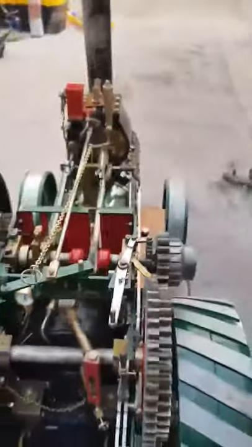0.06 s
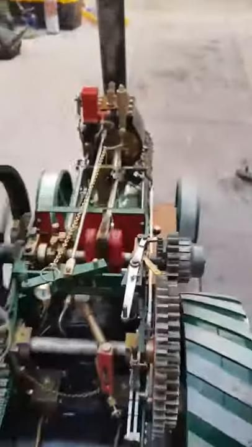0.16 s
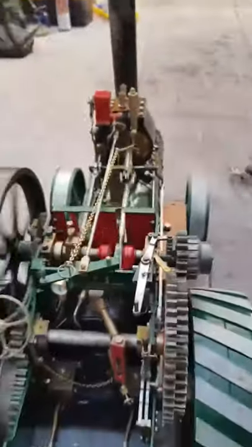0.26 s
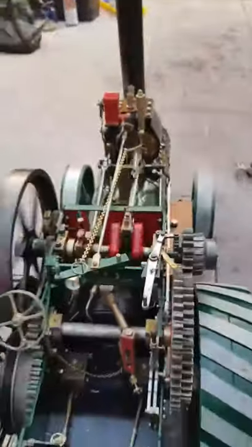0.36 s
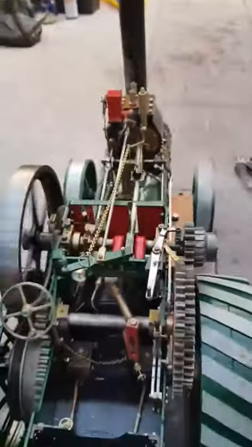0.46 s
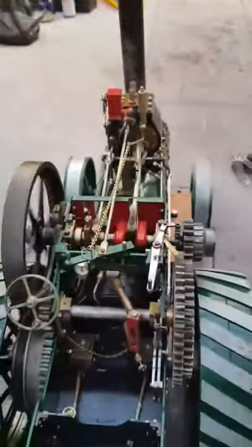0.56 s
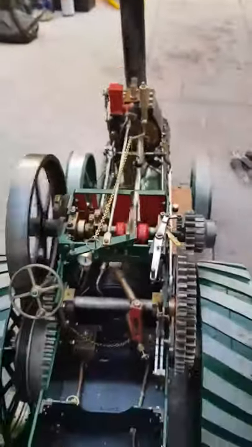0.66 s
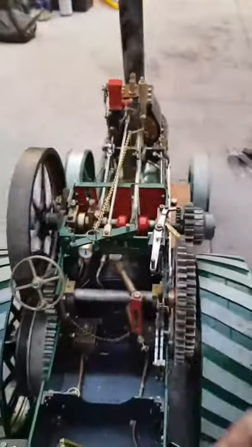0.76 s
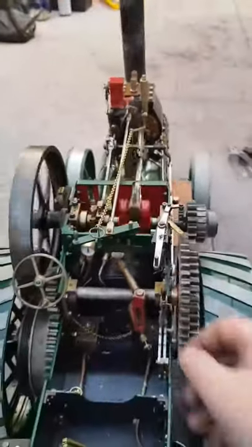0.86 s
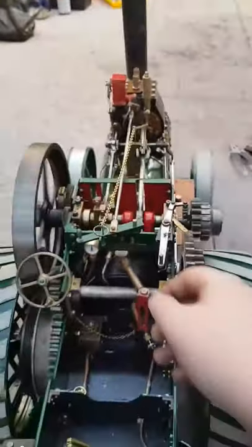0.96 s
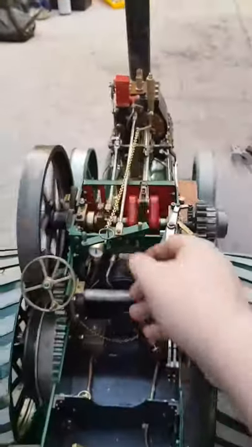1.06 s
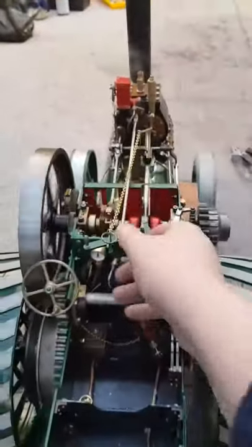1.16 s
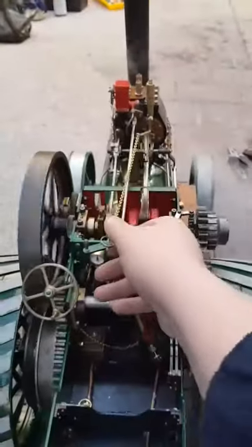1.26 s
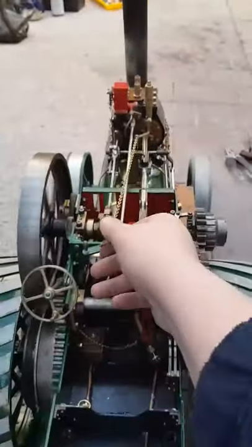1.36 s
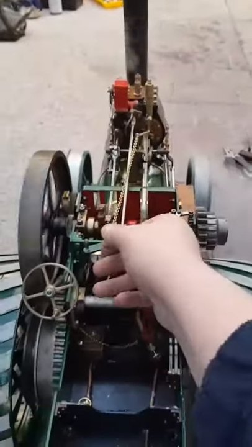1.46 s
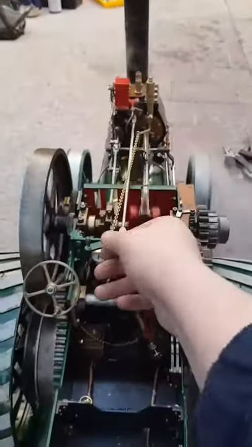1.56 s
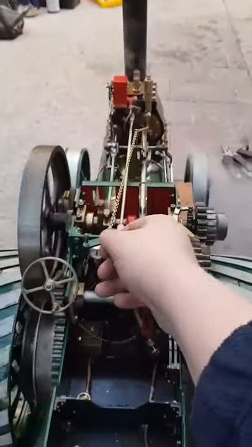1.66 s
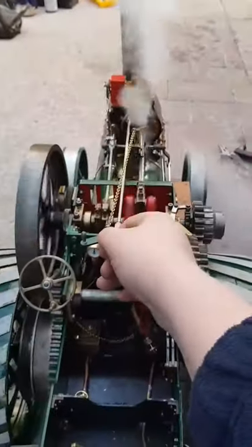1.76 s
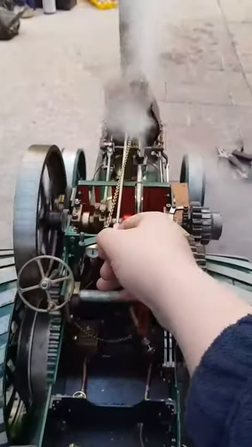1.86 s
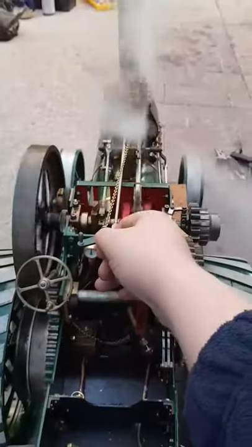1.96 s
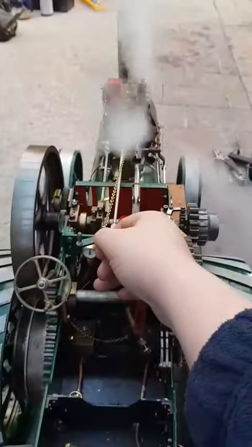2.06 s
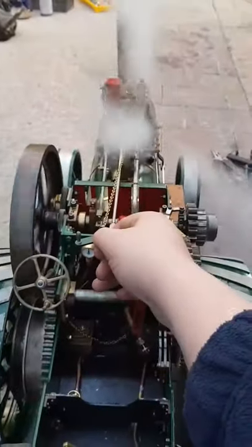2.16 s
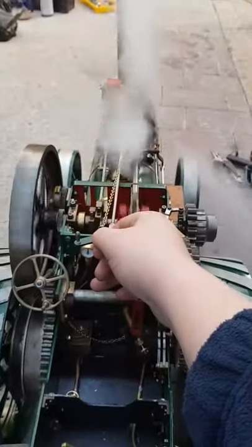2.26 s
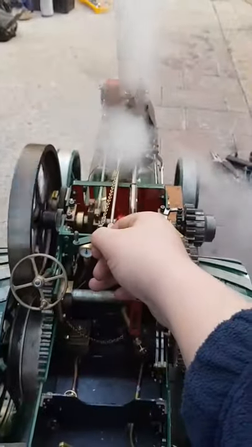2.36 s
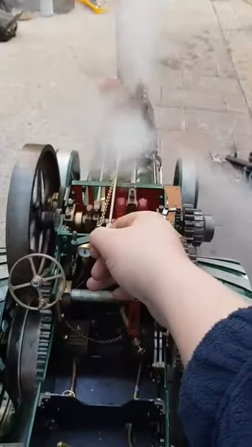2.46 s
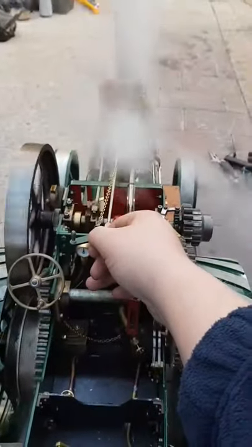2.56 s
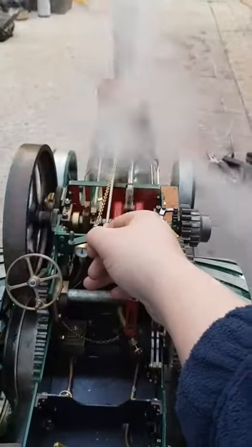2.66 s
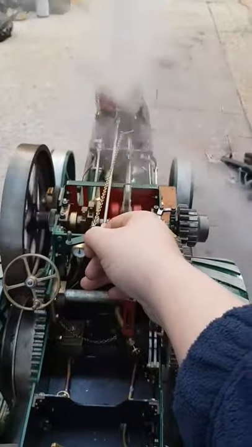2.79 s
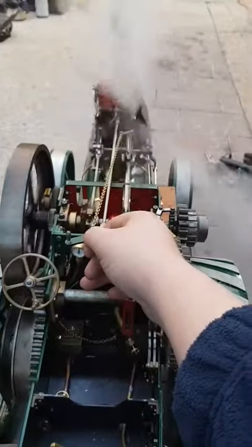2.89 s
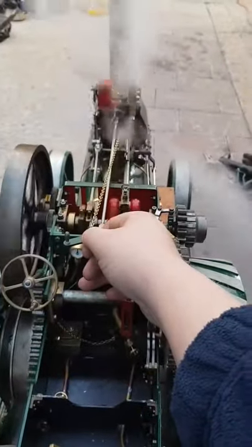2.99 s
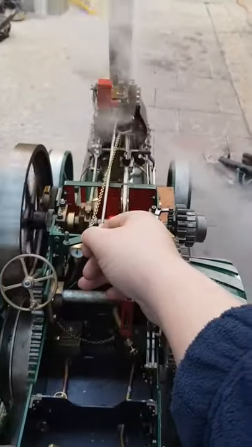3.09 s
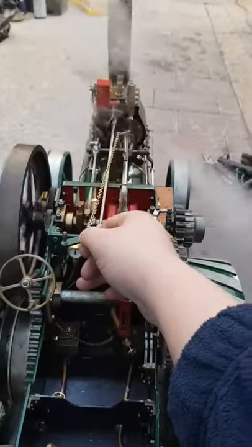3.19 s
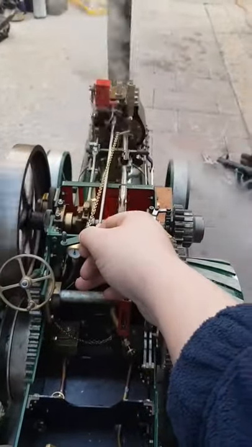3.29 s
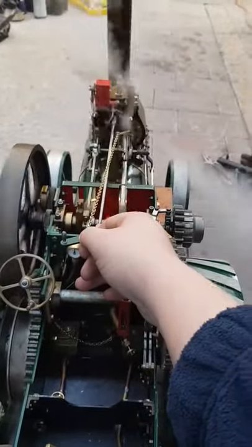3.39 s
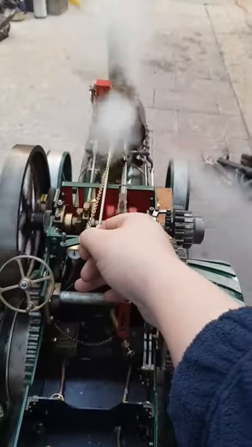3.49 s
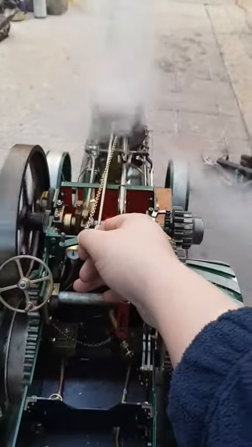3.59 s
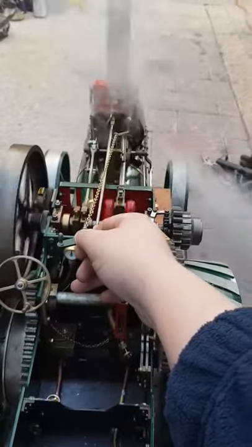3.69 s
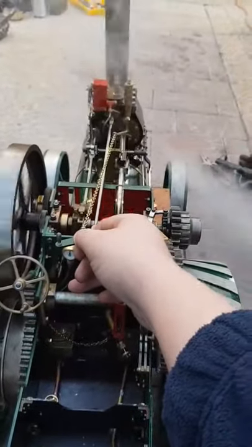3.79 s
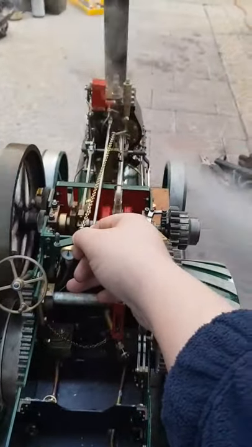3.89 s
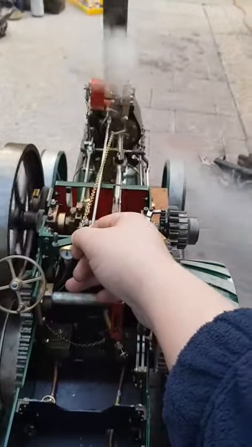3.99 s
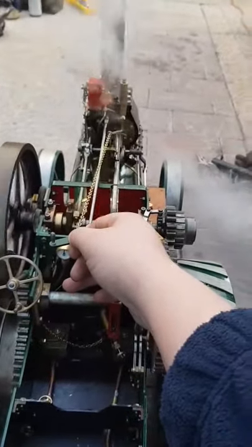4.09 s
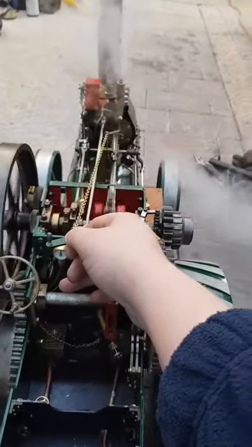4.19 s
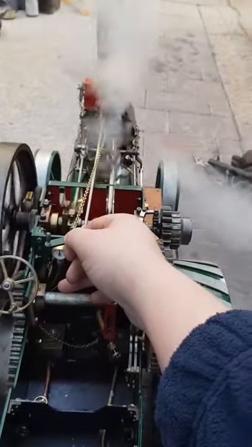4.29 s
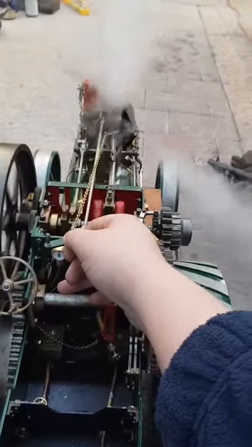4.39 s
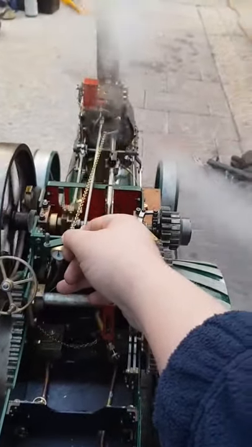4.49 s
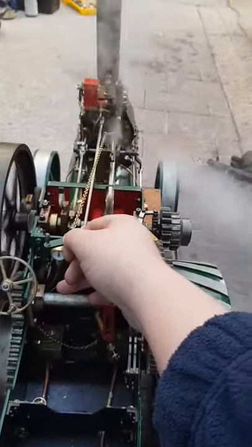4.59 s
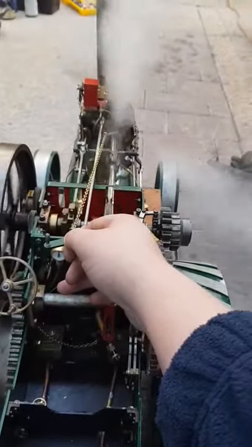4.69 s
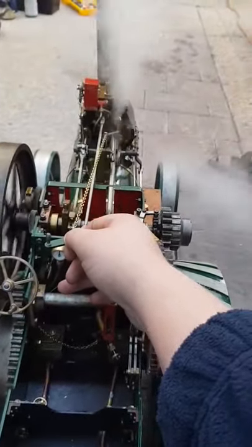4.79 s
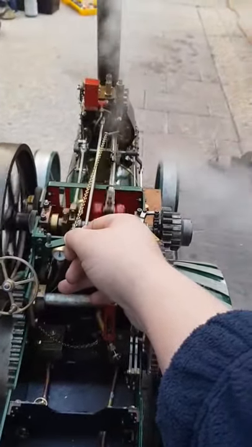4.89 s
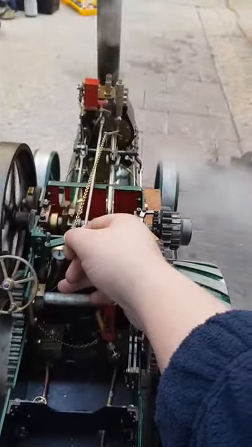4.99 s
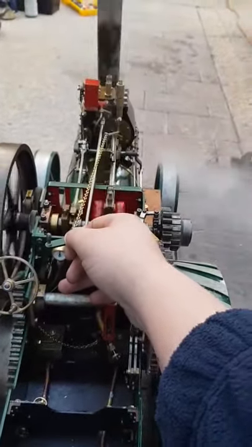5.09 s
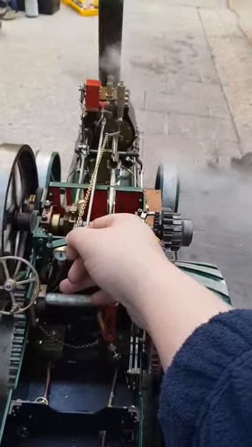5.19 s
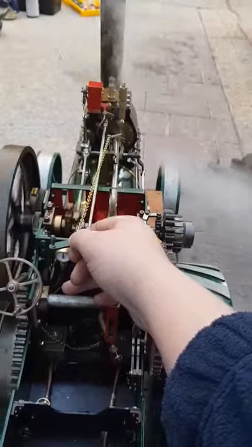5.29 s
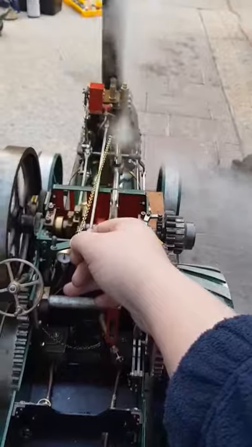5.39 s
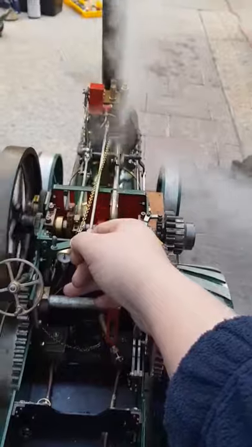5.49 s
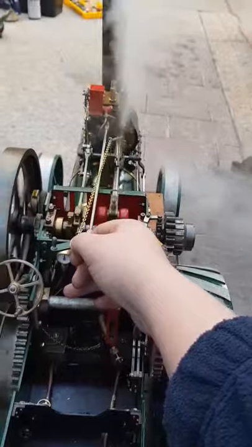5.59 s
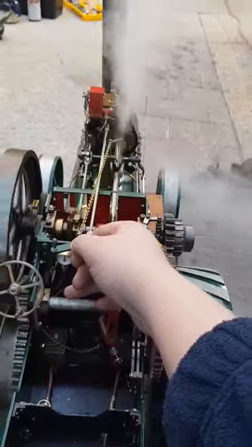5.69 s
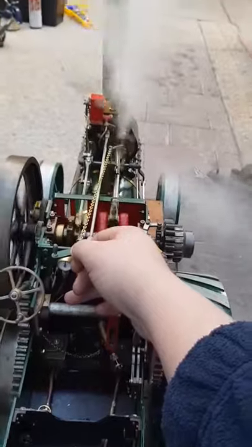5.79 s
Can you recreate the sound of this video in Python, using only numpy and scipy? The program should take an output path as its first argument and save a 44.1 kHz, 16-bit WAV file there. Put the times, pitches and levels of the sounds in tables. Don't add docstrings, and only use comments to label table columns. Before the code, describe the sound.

Fast knocking and soft exhaust puffs of a miniature steam engine, with hissing steam and piercing high whistle blasts that waver and sputter.

```python
import sys
import numpy as np
from scipy import signal
from scipy.fft import rfft, irfft, next_fast_len
from scipy.io import wavfile
from scipy.ndimage import uniform_filter1d, map_coordinates

SR = 44100
rng = np.random.default_rng(int(sys.argv[2]) if len(sys.argv) > 2 else 0)


def rack_gain(trim_db):
    fader = np.asarray(trim_db, float)
    return 10 ** (fader / 20)


def log_audio(samples):
    frames = np.atleast_2d(samples).T
    limited = np.clip(frames, -1, 1)
    pcm = np.round(limited * 32767).astype(np.int16)
    wavfile.write(sys.argv[1], SR, pcm)


N = 257984

# time in seconds, flow level in dB.
STEAM_FLOW = [(0.0, -30), (1.755, -32), (1.78, -21.5), (2.31, -26), (2.64, -29.5), (2.93, -28.5),
              (3.32, -35.5), (3.63, -27.5), (3.7, -35), (4.02, -32), (4.22, -29), (4.45, -25),
              (4.56, -36.5), (4.69, -26.5), (4.81, -25.5), (5.05, -34.5), (5.46, -28.5), (5.85, -26.5)]
MEAN_FLOW_DB = -28
# time in seconds, turns done.
CRANK_TURNS = [(-0.127, -1), (1.455, 8), (3.565, 20), (5.129, 29), (6.0015, 34)]
# time in seconds, bell level in dB, pitch in Hz.
LONG_TUG_PHASES = [
    [(1.72, -47, 4720), (1.8, -34, 4720), (1.95, -29, 4830), (2.07, -22, 4800), (2.118, -19, 4710)],
    [(2.14, -7, 4900), (2.19, -12, 4907), (2.24, -11, 4910), (2.275, -16, 4905), (2.3, -9, 4895),
     (2.42, -8, 4868), (2.52, -10, 4866), (2.57, -16, 4865), (2.62, -12, 4865)],
    [(2.7, -25, 4862), (2.9, -27, 4853), (3.0, -23, 4850), (3.04, -22, 4710), (3.15, -34, 4703),
     (3.25, -51, 4700)],
]
# time in seconds, bell level in dB, pitch in Hz.
SHORT_TUGS = [
    [(3.44, -52, 4775), (3.48, -24, 4810), (3.51, -28, 4870), (3.57, -22, 4865), (3.66, -29, 4835),
     (3.73, -45, 4815)],
    [(4.26, -43, 4640), (4.283, -15, 4700), (4.302, -12, 4870), (4.316, -34, 4850), (4.335, -18, 4853),
     (4.41, -17, 4875), (4.46, -26, 4850), (4.5, -25, 4750), (4.58, -42, 4750)],
    [(4.64, -44, 4705), (4.675, -24, 4850), (4.78, -27, 4865), (4.805, -15, 4870), (4.86, -17, 4830),
     (4.9, -19, 4765), (4.95, -25, 4745), (5.03, -34, 4720), (5.1, -52, 4725)],
    [(5.365, -44, 4700), (5.385, -18, 4760), (5.41, -15, 4850), (5.44, -19, 4858), (5.48, -26, 4868),
     (5.6, -25, 4885), (5.75, -24, 4878), (5.85, -25, 4875)],
]
TOP_HZ = 13040


def unit(x):
    return x / np.sqrt(np.mean(x ** 2) + 1e-20)


def along(points, hz):
    f, v = np.transpose(points)
    return np.interp(np.log(hz + 1), np.log(f + 1), v)


def curves(rows):
    s, *cols = np.transpose(rows)
    return [np.interp(np.arange(N) / SR, s, c) for c in cols]


def wobble(rate_hz, channels=1):
    knots = rng.standard_normal((channels, N // 100))
    return np.array([map_coordinates(k, [np.arange(N) * rate_hz / SR]) for k in knots])


def filtered(x, response):
    m = next_fast_len(N + SR // 2)
    return irfft(rfft(x, m) * response(np.fft.rfftfreq(m, 1 / SR)), m)[..., :N]


def body(x, modes):
    def response(f):
        total = 0
        for k, (centre, width, db) in enumerate(modes):
            damping = 1j * f * width
            total = total + (-1) ** k * rack_gain(db) * damping / (centre * centre - f * f + damping)
        return total
    return filtered(x, response)


def rush(spectrum, alike, patchy_db):
    z = signal.stft(rng.standard_normal((2, N + 512)), nperseg=512)[2]
    field = uniform_filter1d(rng.standard_normal(z.shape[1:]), 6, 0)
    field = uniform_filter1d(field, 8, 1)
    pair = signal.istft(z * rack_gain(patchy_db * unit(field)), nperseg=512)[1][:, :N]

    def response(hz):
        turn = np.arccos(np.clip(along(alike, hz), -1, 1)) / 2
        return rack_gain(along(spectrum, hz)) * [np.cos(turn), np.sin(turn)]
    mid, side = filtered(pair, response)
    return unit(np.array([mid + side, mid - side]))


def puffs(s, db, rise_s, fall_s):
    inside = (s >= 0) & (s < N / SR)
    marks = np.bincount((s[inside] * SR).astype(int), rack_gain(db)[inside], N)
    t = np.arange(SR // 4) / SR
    pulse = (1 - np.exp(-t / rise_s)) * np.exp(-t / fall_s)
    return np.abs(signal.fftconvolve(marks, pulse)[:N])


def ports(x, alike, left_db, lag_samples):
    turn = np.arccos(np.clip(alike, 0, 1)) / 2
    left = np.cos(turn) * x[0] + np.sin(turn) * x[1]
    right = np.cos(turn) * x[0] - np.sin(turn) * x[1]
    right = filtered(right, lambda hz: np.exp(-2j * np.pi * hz * lag_samples / SR))
    return np.array([rack_gain(left_db / 2) * left, rack_gain(-left_db / 2) * right])


def each_turn(angles, slop_s):
    # time in seconds, gain in dB.
    nearness = [(0, 4), (.7, 1.5), (2.0, 0), (2.4, -3), (3.5, -3.5), (4.1, 0), (4.6, -1.5), (5.3, -1),
                (5.85, -6)]
    s, turns = np.transpose(CRANK_TURNS)
    at = np.interp(np.arange(turns[0], turns[-1])[:, None] + angles, turns, s)
    at = at + slop_s * rng.standard_normal(at.shape)
    return at, np.interp(at, *np.transpose(nearness))


def yard(x):
    # frequency in Hz, t60 in seconds.
    decay_s = [(150, 0.12), (500, 0.069), (1000, 0.4), (5000, 0.43), (12000, 0.029)]
    hz, t, z = signal.stft(rng.standard_normal((2, SR // 2)), SR, nperseg=256)
    fade_db = -60 * t / along(decay_s, hz)[:, None]
    tail = signal.istft(z * rack_gain(fade_db), SR, nperseg=256)[1]
    tail = tail / np.linalg.norm(tail[0])
    late = np.pad(x, ((0, 0), (300, 0)))
    left, right = signal.fftconvolve(late, tail, axes=1)[:, :N]
    side = filtered((left - right) / 2, lambda f: f ** 2 / (f ** 2 + 450 ** 2))
    return (left + right) / 2 + np.array([side, -side])


def running_gear():
    # time in seconds, rumble level in dB, wind on the left port in dB.
    gear_levels = [(0.0, -31.5, -60.5), (3.5, -36.5, -113), (4.5, -33.5, -76), (5.85, -36, -68)]
    # frequency in Hz, density in dB per Hz.
    rumble_spectrum = [(15, -50), (30, -10.5), (80, -20), (150, -8.5), (270, -9.5), (340, -10.5),
                       (430, -11.5), (680, -4), (780, -9.5), (1170, -15), (1440, -10.5), (1880, -17.5),
                       (3000, -20.5), (4500, -43)]
    # frequency in Hz, likeness 0-1.
    rumble_alike = [(60, .95), (200, .97), (400, .78), (700, .4), (1500, .05)]
    # frequency in Hz, density in dB per Hz.
    wind_spectrum = [(25, 1), (60, 14), (130, -28), (250, -21), (500, -6)]
    # time in seconds, level in dB.
    hand_bumps = [
        (1.24, -13),
        (1.376, 0),
        (1.41, -11),
    ]
    plate_modes = [(75, 40, -3), (120, 50, 0), (250, 90, 0)]  # Hz, width Hz, dB

    gear_db, wind_db = curves(gear_levels)
    rumble = rack_gain(gear_db + 0.5 + 0.56 * wobble(13)) * rush(rumble_spectrum, rumble_alike, patchy_db=2.0)
    gusts_db = 2 * wobble(9)
    wind = rack_gain(wind_db + gusts_db) * rush(wind_spectrum, [(60, 0)], patchy_db=-8) * rack_gain([[0], [-12]])
    s, db = np.transpose(hand_bumps)
    bump = body(puffs(s, db, rise_s=.0007, fall_s=.0012), plate_modes) * rack_gain([[3], [-3]])
    return rumble + wind + bump


def exhaust():
    # crank angle in turns, thump level in dB, chuff level in dB.
    strokes = [
        (0, -26, -25.5),
        (.5, -28.5, -31),
    ]
    # frequency in Hz, width in Hz, level in dB.
    boiler_modes = [(80, 35, -8), (143, 42, 0), (185, 55, -1), (272, 30, -7), (390, 40, -10)]
    # frequency in Hz, width in Hz, level in dB.
    ring_modes = [(1437, 60, 0)]
    # frequency in Hz, width in Hz, level in dB.
    chimney_modes = [(2038, 22.3, 3), (2362, 84, -1.5), (2959, 148, 0), (3448, 124, 2), (4250, 650, -2.5),
                     (6110, 560, -6)]
    thump_db_per_near_db, chuff_db_per_near_db = 0.84, 0.58
    thump_scatter_db, chuff_scatter_db = 1.5, 1.5

    angle, thump_db, chuff_db = np.transpose(strokes)
    s, near_db = each_turn(angle, slop_s=.001)
    luck = rng.standard_normal((2,) + s.shape)
    thump_db = (thump_db + thump_db_per_near_db * near_db + thump_scatter_db * luck[0]).ravel()
    chuff_db = (chuff_db + chuff_db_per_near_db * near_db + chuff_scatter_db * luck[1]).ravel()
    s = s.ravel()

    push = puffs(s - .016, thump_db + 29, rise_s=0.0013, fall_s=0.00069)
    rebound = puffs(s + 0.01556, thump_db + 19.5, rise_s=.001, fall_s=0.00065)
    thump = body(push + rebound, boiler_modes) * rack_gain([[.8], [-.8]])

    blast = puffs(s - .014, chuff_db + 31.5, rise_s=0.0078, fall_s=0.0082) * rng.standard_normal((2, N))
    ring = ports(body(blast, ring_modes), alike=0.081, left_db=-2.0, lag_samples=15.3)
    gasp = puffs(s - .016, chuff_db + 15.0, rise_s=0.0049, fall_s=0.029) * rng.standard_normal((2, N))
    chuff = ports(body(gasp, chimney_modes), alike=0.32, left_db=2, lag_samples=3.9)
    return thump, ring + chuff


def valve_gear():
    # crank angle in turns, level in dB.
    knocks = [
        (.065, -18.5),
        (.3, -20),
        (.53, -26),
        (.775, -22.5),
    ]
    # frequency in Hz, width in Hz, level in dB.
    frame_modes = [(503.5, 11.6, -2.5), (700, 300, -11), (680.6, 63.3, 10), (704, 85, 6.5),
                   (800, 170, -1.5), (1088, 70, -9)]
    knock_db_per_near_db, scatter_db = 1.36, 1.8

    angle, db = np.transpose(knocks)
    s, near_db = each_turn(angle, slop_s=.003)
    db = (db + knock_db_per_near_db * near_db + scatter_db * rng.standard_normal(s.shape)).ravel()
    s = s.ravel()
    blow = puffs(s - .006, db + 22, rise_s=0.000067, fall_s=.00025)
    scuff = puffs(s - .007, db + 12.5, rise_s=.001, fall_s=0.0075) * rng.standard_normal((2, N))
    return ports(body(blow * [[1], [.4]] + scuff, frame_modes), alike=.55, left_db=2.5, lag_samples=-5)


def steam():
    # frequency in Hz, density in dB per Hz.
    fizz_spectrum = [(5000, -31), (7000, -4), (8500, -4.5), (10500, 0.5), (12600, 2), (14500, -2)]
    # frequency in Hz, density in dB per Hz.
    roar_spectrum = [(1200, -7.5), (2200, -1), (3200, -7), (4300, 2.5), (5200, 3), (7000, -1.5),
                     (9000, -9.5), (12000, -39)]
    roar_mean_db, roar_db_per_flow_db = -31.5, 0.9
    leak_swell_db, jet_swell_db, jet_opens_s = 2.5, -0.2, 1.6

    t = np.arange(N) / SR
    fizz_db, = curves(STEAM_FLOW)
    roar_db = roar_mean_db + roar_db_per_flow_db * (fizz_db - MEAN_FLOW_DB)
    turn = np.interp(t, *np.transpose(CRANK_TURNS)) + .075
    pressure = uniform_filter1d(1 - 2 * (turn % 1), size=400)
    swell_db = np.where(t < jet_opens_s, leak_swell_db, jet_swell_db) * pressure
    spit_db = 1.18 * wobble(25) + 0.5 * wobble(150)
    fizz = rack_gain(fizz_db + 5.0 + swell_db + spit_db) * rush(fizz_spectrum, [(60, 0.015)], patchy_db=1.0)
    roar = rack_gain(roar_db + 0.7 * swell_db + spit_db) * rush(roar_spectrum, [(60, 0.18)], patchy_db=3.5)
    return (fizz + roar) * rack_gain([[2.1], [-2.1]])


def bell_breath():
    # frequency in Hz, width in Hz, level in dB.
    bell_modes = [(4735, 330, 0)]
    mean_db, db_per_flow_db = -33.5, 0.6

    flow_db, = curves(STEAM_FLOW)
    bell_db = curves(np.concatenate(LONG_TUG_PHASES + SHORT_TUGS))[0]
    open_valve = np.clip((bell_db + 48) / 14, 0, 1)
    hiss = unit(body(body(rng.standard_normal((2, N)), bell_modes), bell_modes))
    level_db = mean_db + db_per_flow_db * (flow_db - MEAN_FLOW_DB) + 2.2 * wobble(30)
    return open_valve * rack_gain(level_db) * hiss * rack_gain([[2.1], [-2.1]])


def whistle():
    # time in seconds, left dB, right dB, length in seconds.
    sputters = [(2.118, -10, -22, 0.005), (3.039, -20, -17.5, 0.0098), (3.103, -37, -29, 0.04),
                (3.484, -16, -21, 0.0083), (4.299, -19, -15, 0.0052), (4.338, -15, -11, 0.0015),
                (4.492, -13, -15, 0.0042), (4.88, -27, -34, 0.0019), (4.892, -8, -31, 0.0016),
                (4.903, -20, -25, 0.0024), (4.925, -8.5, -10.5, 0.0021), (4.937, -33, -29, 0.0011),
                (5.382, -11.5, -19, 0.0048), (5.409, -8, -28, 0.0025), (5.425, -27, -22, 0.0016),
                (5.438, -9, -24, 0.0024)]
    # time in seconds, left lead in rad.
    port_lead = [(2.05, .6), (2.15, 2.3), (2.2, 2.8), (2.33, 2.2), (2.42, .4), (2.5, 2.2), (2.55, 1.2),
                 (2.65, 1.6), (2.72, 3), (3.0, 2), (3.04, .5), (3.5, .5), (4.3, 1), (4.4, 1.6), (4.7, 2),
                 (4.81, 0), (5.43, .7), (5.49, 2.5)]
    bell_left_db, pan_wander_db = 5.5, 2.5

    t = np.arange(N) / SR
    left_db, pitch_hz = curves(np.concatenate(LONG_TUG_PHASES + SHORT_TUGS))
    right_db = left_db - bell_left_db + pan_wander_db * wobble(8.2)[0]
    level_db = np.array([left_db, right_db])
    phase = 2 * np.pi * np.cumsum(pitch_hz + 5 * wobble(40)[0]) / SR
    lead_rad = curves(port_lead)[0] + .3 * wobble(12)[0]

    def jitter():
        return unit(wobble(60, channels=2) + .5 * wobble(400, channels=2))
    lock = np.clip((left_db + 28) / 14, .02, .985)
    noise = np.sqrt((1 - lock) / 2) * (jitter() + 1j * jitter())
    swing = rack_gain(level_db) * (np.sqrt(lock) + noise)
    swing = swing * np.clip((left_db + 44) / 10, 0, 1)
    for s, sputter_left_db, sputter_right_db, length_s in sputters:
        pulse = np.exp(-((t - s) / length_s) ** 2)
        swing = swing + rack_gain([[sputter_left_db], [sputter_right_db]]) * pulse
    port_phase = phase + np.array([[.5], [-.5]]) * lead_rad
    return np.sqrt(2) * np.real(swing * np.exp(1j * port_phase))


def scene():
    thump, chimney = exhaust()
    clatter = chimney + valve_gear()
    walls = rack_gain(-5.5) * yard(clatter + 0.21 * thump)
    return thump + clatter + walls + running_gear() + steam() + whistle() + bell_breath()


def starved(x, margin_db, spread_db, depth_db, coarse_db):
    # Hz, dB
    bar_shape = [(1650, -20), (1900, 0), (4100, 0), (4500, -1.5), (5300, 1), (6300, -3), (9500, -4.5),
                 (10800, -10)]
    wide_bins, long_frames = 4, 3
    hz, _, z = signal.stft(np.array([x[0] + x[1], x[0] - x[1]]) / 2, SR, nperseg=1024)
    band = np.arange(z.shape[1]) // wide_bins
    frame = np.arange(z.shape[2]) // long_frames

    cell = uniform_filter1d(np.abs(z) ** 2, size=wide_bins, axis=1)
    cell = uniform_filter1d(cell, size=long_frames, axis=2)
    cell = np.abs(cell[:, wide_bins // 2::wide_bins, long_frames // 2::long_frames]) + 1e-20
    cell = np.pad(cell, ((0, 0), (0, 1), (0, 1)), "edge")
    luck_db = spread_db * unit(uniform_filter1d(rng.standard_normal(cell.shape), size=2, axis=2))
    cell = cell[:, band][:, :, frame]
    luck_db = luck_db[:, band][:, :, frame]

    hiss = np.median(cell[:, (hz > 5500) & (hz < TOP_HZ)], axis=1, keepdims=True)
    bar_db = margin_db + along(bar_shape, hz)[:, None]
    sunk = 10 * np.log10(cell / hiss) + luck_db < bar_db
    steps = rng.standard_normal(z.shape)[:, np.arange(z.shape[1]) // 2][:, :, frame]
    streak_db = coarse_db * steps * (hz > 1500)[:, None] * (cell < 8 * hiss)
    mid, side = signal.istft(z * rack_gain(streak_db - depth_db * sunk), SR, nperseg=1024)[1][:, :N]
    return np.array([mid + side, mid - side])


def top_cut(x):
    return signal.sosfilt(signal.butter(12, 14390, fs=SR, output="sos"), x)


def record(dry):
    held = dry / (1 + np.abs(dry / .97) ** 8) ** (1 / 8)
    thin = starved(held, margin_db=-5.2, spread_db=3.6, depth_db=40, coarse_db=2.2)
    mix = filtered(thin, lambda hz: (hz < TOP_HZ) * 1j * hz / (45 + 1j * hz))
    return top_cut(mix)


dry = scene()
out = record(dry)
log_audio(out)
```